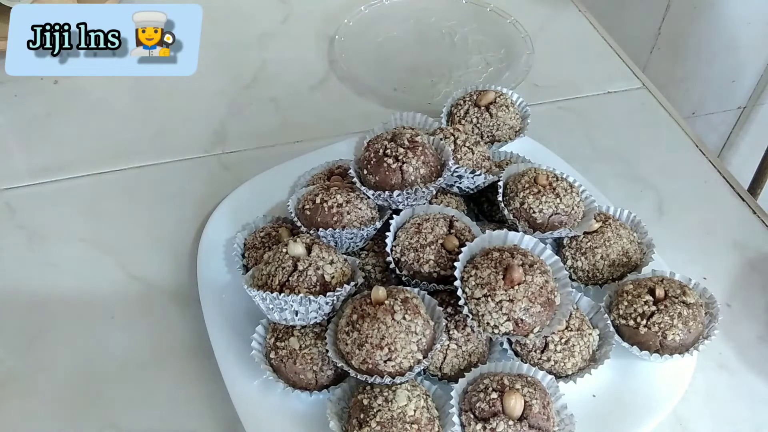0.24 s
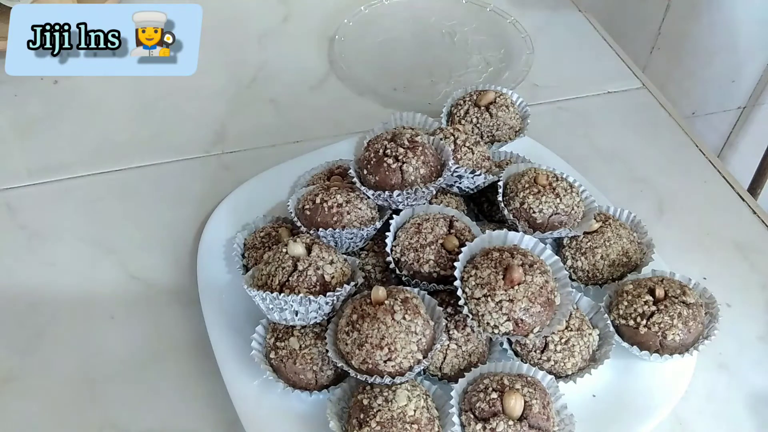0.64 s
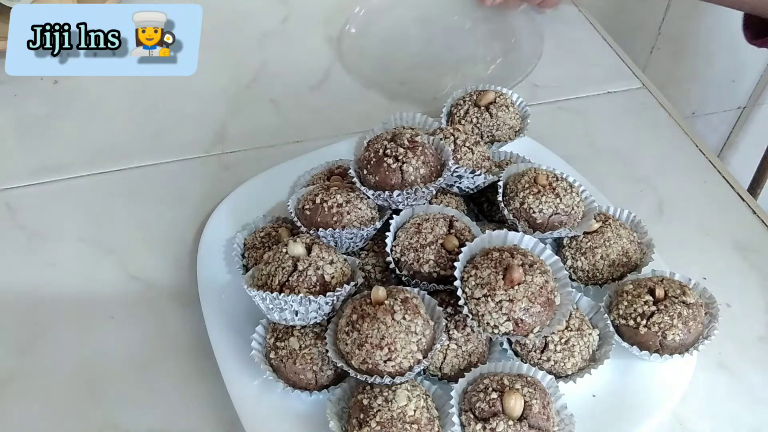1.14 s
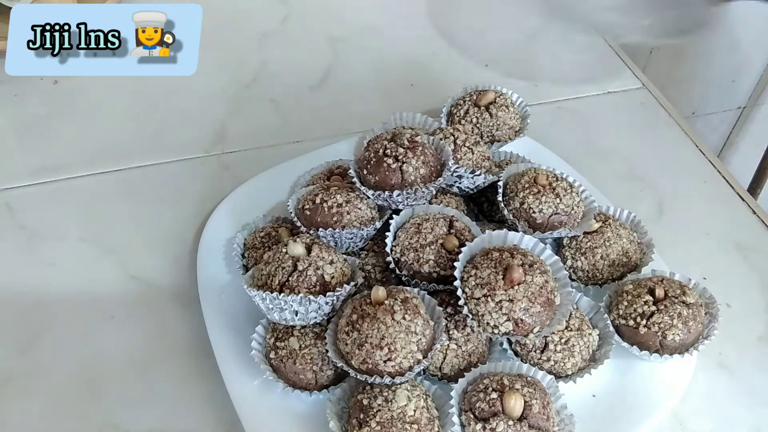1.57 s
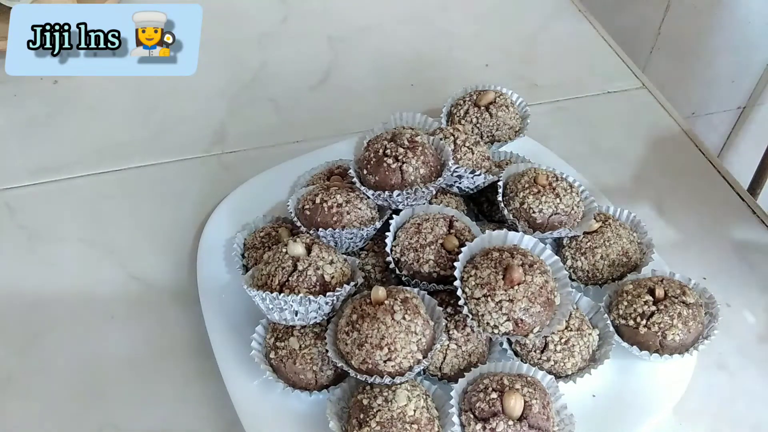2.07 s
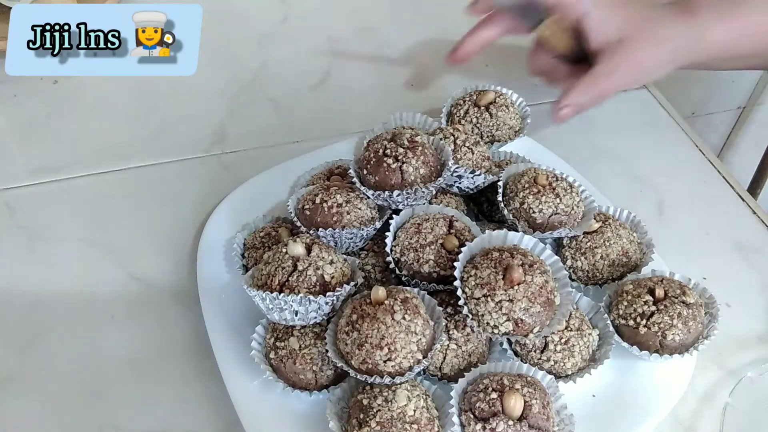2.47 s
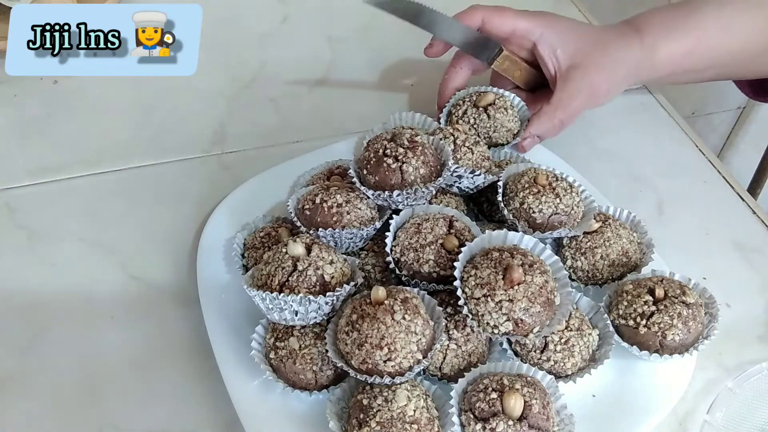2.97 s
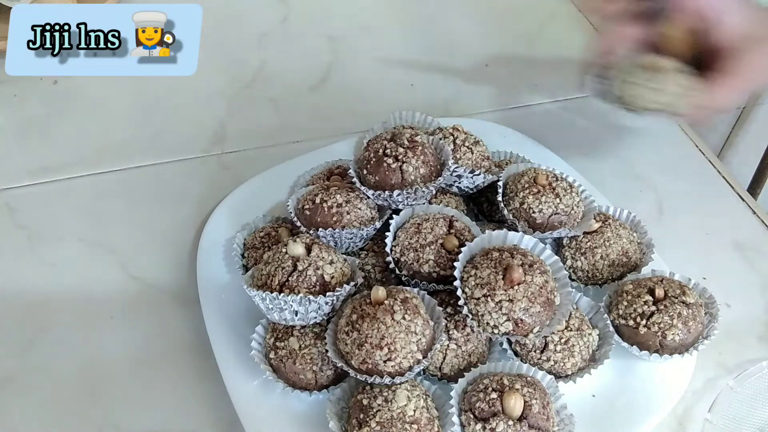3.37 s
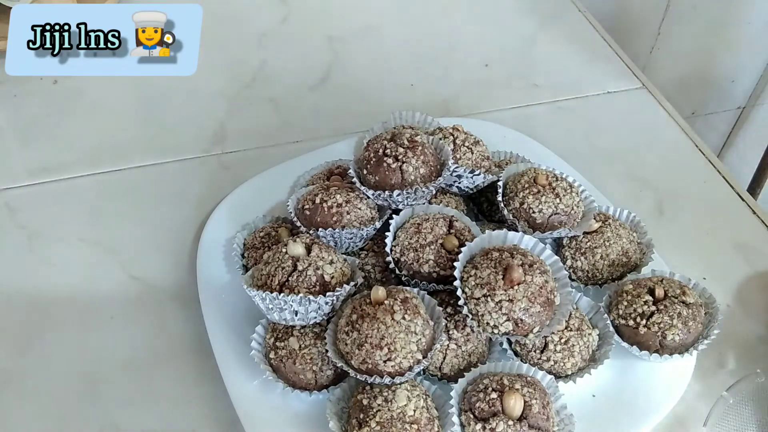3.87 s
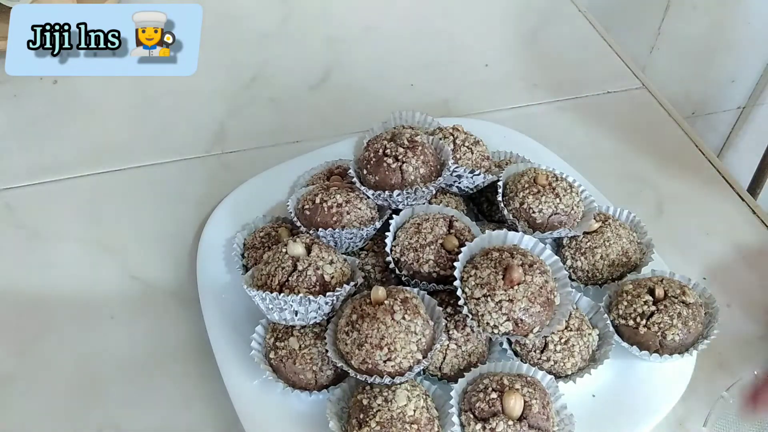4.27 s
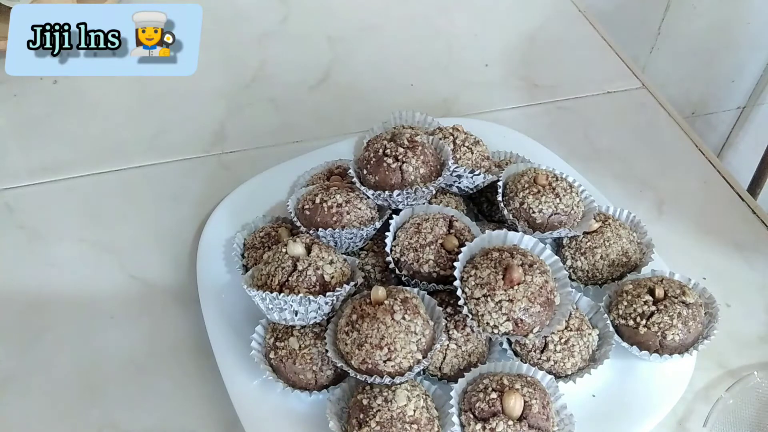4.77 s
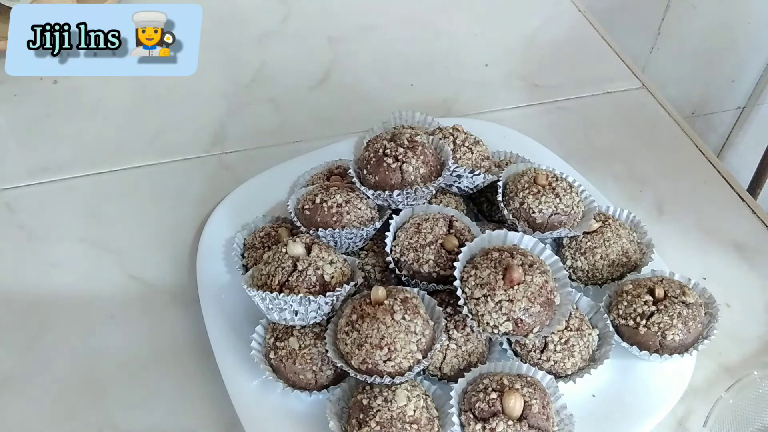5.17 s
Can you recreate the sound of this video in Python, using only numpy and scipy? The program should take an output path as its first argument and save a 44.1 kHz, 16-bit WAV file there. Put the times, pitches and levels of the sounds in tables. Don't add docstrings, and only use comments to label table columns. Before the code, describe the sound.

A small glass dish scrapes over tile, is set down with a clack and rocks, then paper crackles and a hard blade taps ringing glass.

```python
import sys
import numpy as np
from scipy import signal
from scipy.fft import rfft, irfft
from scipy.io import wavfile
from scipy.ndimage import uniform_filter1d, minimum_filter1d

SR = 44100
rng = np.random.default_rng(int(sys.argv[2]) if len(sys.argv) > 2 else 0)


def wrap_up_sound(samples):
    columns = np.atleast_2d(samples).T
    tamed = np.clip(columns, -1, 1)
    steps = np.round(tamed * 32767).astype(np.int16)
    wavfile.write(sys.argv[1], SR, steps)


def gain_from_decibels(decibels):
    exponent = np.asarray(decibels, float) / 20
    return 10 ** exponent


N = 238729
T = np.arange(N) / SR

# peak time in seconds, level in dB, rise in seconds, fall in seconds.
DRONE_SWELLS = [
    (1.56, -59, 0.16, 0.22),
    (2., -68.5, 0.19, 0.17),
    (2.45, -59.5, 0.13, 0.21),
    (2.69, -56.5, 0.11, 0.12),
    (3.7, -56, 0.13, 0.059),
    (3.96, -66.5, .04, 0.0666),
    (4.85, -69, 0.15, 0.037),
    (5.21, -57, 0.1, 0.11),
]
# peak time in seconds, level in dB, rise in seconds, fall in seconds.
THUMPS = [
    (3.47, -72, 0.02, 0.027),
    (.92, -69, 0.033, 0.024),
    (1.19, -68, 0.011, 0.19),
    (2.49, -50, 0.012, 0.059),
    (3.75, -67.5, 0.032, 0.038),
    (3.9, -53, 0.014, .09),
    (4.81, -54.5, 0.032, 0.039),
    (5.22, -63.5, 0.031, 0.082),
]
# peak time in seconds, level in dB, rise in seconds, fall in seconds.
SWAYS = [
    (3.75, -55.5, 0.068, 0.15),
    (4.45, -65, 0.16, 0.18),
    (4.93, -57, 0.11, 0.06),
]
# peak time in seconds, level in dB, rise in seconds, fall in seconds.
SLEEVE_BRUSHES = [
    (0., -68, .01, 0.13),
    (.48, -70.5, 0.14, 0.054),
    (.7, -69.5, 0.21, 0.1),
    (2.15, -70.5, 0.15, 0.19),
    (4.2, -71, 0.1, 0.17),
    (4.6, -66.5, 0.114, 0.12),
    (4.81, -68.5, 0.03, 0.16),
    (5.285, -65, .015, 0.057),
]
# peak time in seconds, level in dB, rise in seconds, fall in seconds.
FINGER_SWEEPS = [
    (.64, -67, 0.093, 0.073),
]
# frequency in Hz, level in dB.
AIR_COLOUR = [(53, -28), (90, -6.5), (135, -19.5), (214, -18.5), (396, -27), (441, -24), (480, -21.5),
              (1070, -28.5), (1440, -27), (1640, -29), (2200, -28), (5250, -35.5), (9910, -33.5),
              (14200, -42.5)]
AIR_DB, DRONE_DB, THUMP_DB, SWAY_DB = -68, -75, -75.5, -62

# peak time in seconds, level in dB, rise in seconds, fall in seconds.
RUSTLES = [(.05, -65.5, 0.16, 0.25), (.35, -73.5, 0.18, 0.029), (.575, -59, 0.036, 0.015),
           (.95, -75, 0.026, 0.13), (1.95, -65.5, 0.021, 0.037), (2.1, -72, 0.023, 0.034),
           (3.05, -59.5, 0.11, 0.055), (3.146, -54.5, 0.012, 0.036), (3.39, -56, 0.18, 0.022),
           (4.225, -61.5, 0.064, 0.0098), (4.54, -65.5, 0.092, 0.15), (4.8, -67, 0.044, 0.035),
           (5.24, -72.5, 0.5, 0.036), (5.38, -68, .015, 0.075)]
# start in seconds, peak in dB, length in seconds, low tones in dB.
CRACKS = [(1.937, -58, .02, -32), (2.079, -58.5, 0.016, -24), (2.409, -53, 0.0069, -29),
          (2.871, -49, 0.014, -9.5), (3.084, -46.5, 0.011, -33), (3.125, -44.5, 0.029, -7),
          (3.145, -27, 0.0076, -17), (3.173, -33, 0.023, -17.5), (3.79, -55, .006, -25),
          (4.068, -49, .003, -35), (4.074, -42.5, 0.0054, -32), (4.206, -37.5, 0.014, -20),
          (4.222, -35.5, 0.0062, -25), (4.281, -53, 0.013, -22), (4.306, -53, 0.0066, -12),
          (4.486, -51.5, 0.038, -37), (4.542, -43.5, 0.011, -42), (4.586, -53, 0.02, -33),
          (4.795, -45, 0.026, -47), (4.812, -58, 0.013, -5), (5.113, -60, 0.015, -37.5),
          (5.181, -51.5, 0.0076, -16), (5.279, -51, 0.015, -37), (5.372, -53.5, 0.0083, -23)]
# frequency in Hz, level in dB.
PAPER_COLOUR = [(1470, -18.5), (2500, -8), (2870, -18.5), (3300, -10.5), (3790, -6), (6000, -7), (6600, -5),
                (9780, 2), (13700, -22), (14300, -11)]
SNAP = 1

# peak time in seconds, level in dB, rise in seconds, fall in seconds,
# brightness in dB.
DRAGS = [(1.16, -57, .05, 0.016, -3), (1.184, -43, 0.021, 0.028, -5), (1.245, -39, .02, 0.031, -5.5),
         (1.3, -38, 0.027, 0.023, -5.5), (1.34, -39, 0.043, 0.0035, -20), (1.378, -38, .01, 0.066, -12.5),
         (1.43, -49, 0.023, 0.009, 2.5), (2.18, -63, 0.066, 0.024, -34), (2.56, -50, .02, 0.16, -11.5),
         (3.2, -64, 0.26, 1, -38), (3.872, -38.5, 0.017, 0.0019, 2.5), (3.955, -45, .012, 0.026, 8.5)]
# start in seconds, peak in dB, contact in ms,
# length in seconds, judder in Hz.
BUMPS = [(1.174, -31, 0.078, 0.0098, 643), (1.179, -29.5, 0.053, 0.0063, 1420),
         (1.221, -34, 0.22, 0.0036, 630), (1.233, -46, 0.086, 0.0047, 1420),
         (1.254, -29, 0.14, 0.0032, 1603), (1.29, -40, 0.08, 0.005, 3320), (1.295, -24, 0.17, 0.0026, 1597),
         (1.315, -26, 0.1, 0.0068, 2330), (1.319, -23, 0.069, 0.0017, 1258),
         (1.333, -20.5, 0.036, 0.0051, 1220), (1.335, -16.5, 0.086, 0.0037, 2395),
         (1.356, -28.5, 0.053, 0.0041, 2330), (1.368, -23, 0.09, 0.0043, 1265),
         (1.377, -26, 0.069, 0.0043, 1206), (1.387, -24, 0.057, 0.0019, 1215),
         (1.395, -27, 0.12, 0.0034, 1970), (1.403, -39, 0.11, 0.00099, 2280),
         (1.427, -31.5, 0.29, 0.0052, 1160), (1.432, -34, 0.11, 0.0016, 5390),
         (1.447, -45, 0.15, 0.004, 1420)]
# start in seconds, peak in dB.
TICKS = [(1.180, -42), (1.221, -39.5), (1.236, -45), (1.247, -53), (1.2571, -46), (1.2965, -36),
         (1.3184, -42), (1.3354, -48), (1.362, -37), (1.3718, -50), (1.388, -44), (1.398, -49),
         (1.4207, -44), (1.428, -28), (1.455, -30.5), (1.47, -44)]
GRIT_DB, SOFTEST_S = 3.0, 0.0028
JUDDER_TONE = 0.046
PRESSED_DB, PRESSED_S = -6, 0.0028
LANDING_GRIT_DB, LANDING_GRIT_S, LANDING_BRIGHT_DB = -9, 0.02, -9.5

# start in seconds, peak in dB, chatter length in seconds,
# chatter in dB, thud in dB.
SET_DOWN = [
    (2.483, -13, 0.002, -19, -33),
    (2.512, -51, .004, -6, -25.5),
    (2.533, -38, .006, -17, -26.5),
]
# start in seconds, peak in dB, chatter length in seconds, chatter in dB, thud in dB.
NUDGES = [
    (3.407, -21, 0.005, -8.5, -21),
    (3.413, -25, 0.0094, -8.5, -23),
    (3.454, -18, 0.0036, -6.5, -19.5),
    (3.462, -22, 0.0064, -2.5, -20),
    (3.469, -26, 0.0013, -13.5, -20),
]
# start in seconds, peak in dB, chatter length in seconds, chatter in dB, thud in dB.
KNIFE_TAPS = [
    (3.859, -39, .004, -6, -24),
    (3.874, -4.5, 0.0035, -13, -29),
    (3.8775, -10, 0.0015, -8.5, -32),
    (3.884, -16, 0.0023, -0.5, -30),
    (3.892, -14.5, .008, -8, -28.5),
    (3.921, -22.5, 0.0045, -4, -30),
    (3.948, -28.5, 0.017, -5, -36),
]
# start in seconds, peak in dB,
# bowl tone in Hz, foot tone in Hz, foot tone in dB.
ROCKS = [(2.6348, -43.5, 1106, 513, -5), (2.6684, -41, 1158, 735, -10), (2.7030, -34.5, 1250, 747, -14.5),
         (2.7394, -47.5, 1215, 710, -3), (2.7655, -39.5, 1202, 666, -14), (2.8346, -42, 1127, 547, -5),
         (2.8688, -41, 1230, 560, -6), (2.9054, -53, 1136, 635, 5.5), (2.9445, -43.5, 1228, 573, -11),
         (2.98, -43.5, 1240, 683, -4), (3.017, -39.5, 1266, 660, -22), (3.0434, -61, 1200, 670, -6),
         (3.0680, -51.5, 1160, 654, 2.5), (3.0905, -45.5, 1210, 545, -11.5), (3.167, -44, 1246, 721, -4.5),
         (3.2276, -52.5, 1126, 710, 2), (3.2605, -53.5, 1240, 684, 4.5), (3.2894, -66, 1240, 730, 7),
         (3.3134, -61, 1270, 673, 9.5), (3.3494, -61.5, 1340, 652, 9.5)]
RIM_DB = -33.5

# frequency in Hz, time to fall 60 dB in seconds, left minus right in
# dB, then level in dB when dragged, set down, nudged and tapped by the knife.
DISH_MODES = [(508.6, 0.36, -9.5, -12.5, -16, -19, -40.5), (772, 0.04, -6.5, -9.5, -9.5, -15.5, -19.5),
              (1336, 0.066, -4, -21.5, -24, -10.5, -17), (1222, 0.12, 3, -1, -18, -2.5, -19),
              (1462, 0.12, 6, -7.5, -25.5, -26, -14), (1634, 0.034, 6, 2, -6.5, -2, -14.5),
              (2012, 0.35, 12, -8, -6.5, -16.5, -16), (2320, 0.25, 9, -15.5, -5.5, 0.5, -3.5),
              (2304, 1.3, 9.5, -32, -27, -20, -20), (641, 0.095, -1, -3, -22, -28.5, -18),
              (294.6, 0.37, 1, -13.5, -43, -14, -25), (1055, 0.049, 1, -15.5, -4.5, -12.5, -28),
              (1582, 0.12, 5, -12, -17, -16.5, -15), (1760, 0.047, -1, -14, -21, -9.5, -19.5),
              (3471, 0.52, 9, -28, -36, -13, -13), (3140, 0.05, -7, -33, -26.5, 2, -7),
              (3718, 0.17, 4.5, -11.5, -19, -16.5, -11.5), (3381, 0.17, 14.5, -11, -27.5, -12, -10),
              (5380, 0.28, -5, -10, -10, -9, -10), (4430, 0.087, 3, -27.5, -15, -26, -30.5),
              (5710, 0.036, -4, -36, -17.5, -24.5, -13), (5832, 0.35, 3, -29.5, -21, -24, -11),
              (3407, 0.46, 0.5, -27, -7.5, -26, -26), (2325, .35, 8.5, 0, -38, -27.5, -27.5),
              (2878, 0.038, 9, -24, -38, -14, -13.5), (4660, 0.071, -2, -23, -20, -24, -24),
              (5470, 0.49, 0.5, -24.5, -13.5, -37, -18.5), (5650, 0.077, -3.5, -27, -7, -22, -17),
              (7870, 0.26, -14, -8, -25, -18, -7.5), (8016, 0.14, -9.5, -7, -7, -9.5, -7),
             (8040, 0.36, 13.5, -20.5, -21.5, -24, -23), (8880, 0.05, 14, -21.5, -41, -27, -18.5),
             (10650, 0.06, 6, -10.5, -6.5, -25, -19), (10870, 0.15, 8.5, -15.5, -9, -21.5, -12),
             (13630, 0.1, -16, -28, -22, -52, -26), (14140, .1, 6, -22.5, -32, -31, -28.5),
             (7195, 0.34, 1.5, -19, -31, -22.5, -19.5), (8700, 0.033, 5.5, -18.5, -31, -37, -20),
             (9530, 0.093, 0, -24, -24.5, -42, -22.5), (10250, .08, 0, -27, -32, -40, -20.5),
             (8000, 0.3, 2, -11, -33, -20, -12), (6830, .1, 0, -28.5, -30, -31, -32)]
HOLD = {3: (0.36, 0.57), 4: (0.28, 0.56), 5: (0.26, 0.33), 6: (0.31, 0.31)}
DAMPED_T60_S = 0.018
# frequency in Hz, level in dB.
RING_FILTER = [(150, -32), (300, -4), (11050, 0.5), (11500, -38), (13100, -42.5), (13600, 1)]
# frequency in Hz, level in dB.
COUNTER_COLOUR = [(60, -41), (150, -30), (300, -18.5), (600, -2.5), (1200, 15), (2100, 7.5), (2600, -2),
                  (4000, -6.5), (8000, -23), (11000, -32.5), (12000, -56.5), (15500, -42.5)]

# frequency in Hz, time to fall 60 dB in seconds.
ROOM_DECAY = [(100, 0.55), (260, 0.36), (700, 0.38), (1840, 0.33), (4850, 0.34), (12800, 0.21)]
# frequency in Hz, likeness from -1 to 1.
NOISE_LIKENESS = [(30, 0.93), (90, 1), (180, 0.73), (350, 0.4), (750, 0.3), (1300, -0.31), (3000, -0.042),
                  (5000, -0.13), (6500, 0.5), (15000, 0.96)]
# frequency in Hz, left minus right in dB.
PORT_DIFFERENCE = [(60, 0), (180, -3), (400, 1.5), (5000, -1), (7000, -5), (10000, 5), (14000, 17)]
# frequency in Hz, level in dB.
PORT_TOP = [(14250, 0), (14550, -22), (15100, -22), (15700, -28), (15800, -90)]
# frequency in Hz, depth under the loudest neighbour in dB.
MASK = [(3000, 60), (4000, 35), (5000, 33), (6200, 22), (7400, 21.5), (9500, 26.5), (12000, 22),
        (13400, 16.5), (13700, 61)]
ROOM_DB, RIGHT_LAG_S, MASK_DEPTH_DB = -2.5, 0.000194, 24.5


def on_log(table, hz):
    points = np.array(table)
    return np.interp(np.log(hz + 1), np.log(points[:, 0]), points[:, 1])


def colour(x, table):
    n = x.shape[-1]
    gain = gain_from_decibels(on_log(table, np.fft.rfftfreq(n, 1 / SR)))
    return irfft(rfft(x) * gain, n)


def band(x, lo_hz, hi_hz):
    return signal.sosfilt(signal.butter(2, [lo_hz, hi_hz], "band", fs=SR, output="sos"), x)


def unit(x):
    return x / np.sqrt(np.mean(x ** 2))


def lean(db):
    return gain_from_decibels(np.array([[.5], [-.5]]) * db)


def pair(n, near=0.):
    like = np.clip(on_log(NOISE_LIKENESS, np.fft.rfftfreq(n, 1 / SR)), -1, 1)
    like = np.clip(like + near * (1 - like), -1, 1)
    mid, side = rfft(rng.standard_normal((2, n)))
    shared = mid * np.sqrt((1 + like) / 2)
    opposed = np.array([[1], [-1]]) * side * np.sqrt((1 - like) / 2)
    return irfft(shared + opposed, n)


def walk(rate):
    k = int(SR / rate)
    return unit(uniform_filter1d(uniform_filter1d(rng.standard_normal(N), k), k))


def swells(table):
    s, db, rise, fall = np.array(table, float)[:, :4, None].transpose(1, 0, 2)
    width = np.maximum(np.where(T < s, rise, fall), .001)
    return gain_from_decibels(db) * np.exp(-((T - s) / width) ** 2)


def fade(t, t60):
    return np.exp(-np.log(1000) * t / t60)


def tone(hz, t60, t):
    return (t >= 0) * fade(t, t60) * np.sin(2 * np.pi * hz * t)


def add(x, s, piece):
    i = int(s * SR)
    x[..., i:i + piece.shape[-1]] += piece[..., :N - i]


def through(force, response):
    return signal.fftconvolve(force[None], response, axes=1)[:, :N]


def room_air():
    return gain_from_decibels(AIR_DB + 0.18 * walk(3.7)) * unit(colour(pair(N), AIR_COLOUR))


def far_traffic():
    drone = unit(band(band(pair(N), 68, 88), 45, 84))
    return drone * (gain_from_decibels(DRONE_DB) + swells(DRONE_SWELLS).sum(axis=0))


def cupboard_thumps():
    return unit(band(pair(N), 62, 210)) * (gain_from_decibels(THUMP_DB) + swells(THUMPS).sum(axis=0))


def phone_sway():
    return unit(band(pair(N), 8.7, 35)) * (gain_from_decibels(SWAY_DB) + swells(SWAYS).sum(axis=0))


def sleeves():
    return unit(band(pair(N), 210, 1100)) * swells(SLEEVE_BRUSHES).sum(axis=0) * gain_from_decibels(3.1 * walk(28))


def paper_cup():
    high, low, t = np.zeros((2, N)), np.zeros((2, N)), np.arange(4000) / SR
    for s, db, length, low_db in CRACKS:
        shape = SNAP * np.exp(-t / 0.0018) + 0.4 * np.exp(-t / max(length, .001))
        burst = gain_from_decibels(db + 0.5) * pair(len(t)) * shape
        add(high, s, burst)
        add(low, s, gain_from_decibels(low_db) * burst)
    grains = pair(N) * gain_from_decibels(2 * rng.exponential(size=N) + 3.2 * walk(70))
    rustle = unit(colour(grains, PAPER_COLOUR)) * swells(RUSTLES).sum(axis=0)
    return colour(high, PAPER_COLOUR) + gain_from_decibels(5.0) * band(low, 2000, 6200) + rustle


def fingertip():
    return unit(band(pair(N), 1760, 2260)) * swells(FINGER_SWEEPS).sum(axis=0)


def ring(column):
    lead_s = .005
    t = np.arange(SR // 4) / SR - np.array([[lead_s], [lead_s + RIGHT_LAG_S]])
    clear_length, damped_share = HOLD[column]
    out = 0
    for k, row in enumerate(DISH_MODES):
        hz, t60, left_right_db = row[:3]
        split = 1 + np.array([-.012, .014])[:, None, None] + 0.019 * rng.standard_normal((2, 2, 1))
        mode = 0.78 * tone(hz, clear_length * t60, t)
        mode = mode + sum(damped_share * tone(hz * d, DAMPED_T60_S, t) for d in split)
        out = out + (-1) ** k * gain_from_decibels(row[column]) * lean(left_right_db) * mode
    return colour(out * np.clip(t / .0003, 0, 1), RING_FILTER)[:, int(lead_s * SR):] / 4


def dragged():
    grit = rng.standard_normal(N) * gain_from_decibels(GRIT_DB * rng.exponential(size=N) + 2.9 * walk(90))
    dull, bright = unit(band(grit, 360, 2800)), unit(band(grit, 3000, 9200))
    landings = [(r[0], r[1] + LANDING_GRIT_DB, .004, LANDING_GRIT_S, LANDING_BRIGHT_DB) for r in ROCKS]
    strokes = DRAGS + landings
    gains = swells(strokes)
    level = gains.sum(axis=0)
    edge = gain_from_decibels(np.array(strokes)[:, 4]) @ gains
    force = gain_from_decibels(-26.0) * (level * dull + gain_from_decibels(11.0) * edge * bright)

    t, pressed = np.arange(800) / SR, np.zeros((2, N))
    late = np.clip(t - np.array([[0], [RIGHT_LAG_S]]), 0, 1)
    for s, db, contact_ms, length, hz in BUMPS:
        u = t[:80] / max(contact_ms, .02) * 1000
        push = u * np.exp(-4 * u)
        swell = max(length / 2, SOFTEST_S / 3)
        judder = 0.41 * rng.standard_normal(len(t)) + JUDDER_TONE * np.sin(2 * np.pi * hz * t)
        judder = judder * t / swell * np.exp(-t / swell)
        add(force, s, gain_from_decibels(db - 11.5) * np.convolve(judder, push / push.sum()))
        spot = (late / PRESSED_S) ** 2 * np.exp(-late / PRESSED_S) * np.sin(2 * np.pi * hz * late)
        add(pressed, s, gain_from_decibels(db + PRESSED_DB) * spot)
    click = np.array([1., -1.])
    for s, db in TICKS:
        add(force, s, gain_from_decibels(db) * click)
    for row in ROCKS:
        add(force, row[0], gain_from_decibels(row[1] - 4.0) * click)
    scrape = gain_from_decibels(-15.0 + 2.9 * walk(50)) * level * colour(pair(N, near=0.52), COUNTER_COLOUR)
    return through(force, ring(column=3)) + scrape + pressed


def blows(table, column, knock_db):
    force, thud, t = np.zeros(N), np.zeros((2, N)), np.arange(4000) / SR
    for s, db, length, chatter_db, thud_db in table:
        chance = rng.standard_normal((2, len(t)))
        rebounds = chance[0] * (chance[1] > 1.6) / (1 + (t / length) ** 4)
        hits = rfft((t == 0) + gain_from_decibels(chatter_db) * rebounds)
        even = irfft(hits / np.sqrt(abs(hits) ** 2 + 0.5), len(t))
        add(force, s, gain_from_decibels(db + 6) * even / (1 + (t / length / 2) ** 4))
        boom = unit(band(pair(len(t), near=0.26), 240, 1600))
        add(thud, s, gain_from_decibels(db + thud_db) * boom * fade(t, 0.098))
    knock = pair(len(t), near=0.2) * fade(t, 0.026)
    knock = gain_from_decibels(knock_db) * colour(through(force, knock), COUNTER_COLOUR)
    return through(force, ring(column=column)) + knock + thud


def set_down():
    return blows(SET_DOWN, column=4, knock_db=-11)


def rocking():
    out, t = np.zeros((2, N)), np.arange(4000) / SR - np.array([[0], [RIGHT_LAG_S]])
    for s, db, bowl_hz, foot_hz, foot_db in ROCKS:
        near = 1 + 0.0554 * rng.standard_normal(4)
        bowl = tone(bowl_hz, 0.073, t) + .5 * tone(bowl_hz * near[0], 0.14, t)
        foot = tone(foot_hz, 0.11, t[0]) + .5 * tone(foot_hz * near[1], 0.02, t)
        rim = tone(1600 * near[2], 0.056, t) - tone(2260, 0.04, t)
        rim = rim + gain_from_decibels(19.5) * tone(302, 0.056, t[0]) + .5 * tone(2000 * near[3], .04, t)
        landing = bowl + gain_from_decibels(foot_db) * foot + gain_from_decibels(RIM_DB) * rim
        add(out, s, gain_from_decibels(db - 2.0) * np.clip(t / 0.0033, 0, 1) * landing)
    return out


def nudged():
    return blows(NUDGES, column=5, knock_db=-12)


def knife():
    return blows(KNIFE_TAPS, column=6, knock_db=-16.5)


def kitchen_echo(x):
    t = np.arange(int(.7 * SR)) / SR
    noise, tail = pair(len(t), near=0.1), 0
    for hz in 70 * 2. ** np.arange(8):
        tail = tail + band(noise, hz, hz * 2) * fade(t, on_log(ROOM_DECAY, hz * 1.3))
    tail = tail * np.clip(t / 0.0012, 0, 1)
    tail = tail / np.sqrt(np.sum(tail ** 2, axis=1, keepdims=True))
    return gain_from_decibels(ROOM_DB) * through(x.mean(axis=0) + x[0], tail) / 2


def scene():
    near = lean(-1.9) * dragged()
    near = near + lean(-.3) * rocking()
    near = near + lean(4.9) * set_down()
    near = near + lean(.4) * nudged()
    near = near + lean(0.63) * knife()
    near = near + paper_cup()
    echo = kitchen_echo(near)
    background = room_air() + far_traffic() + cupboard_thumps() + phone_sway() + sleeves() + fingertip()
    return near + echo + background


def masked(x):
    hz, _, z = signal.stft(x, SR, nperseg=1024)
    power = uniform_filter1d((abs(z) ** 2).mean(axis=0), size=7, axis=0)
    db = 10 * np.log10(power + 1e-20)
    loudest = -minimum_filter1d(-db, size=61, axis=0)
    under = loudest - db - on_log(MASK, hz)[:, None]
    quieter = gain_from_decibels(-MASK_DEPTH_DB * np.clip(under / 4, 0, 1))
    return signal.istft(z * quieter, SR, nperseg=1024)[1][:, :N]


def top_cut(x):
    return signal.sosfilt(signal.butter(12, 15840, fs=SR, output="sos"), x)


def record(dry):
    hz = np.fft.rfftfreq(N, 1 / SR)
    tilt_db = on_log(PORT_DIFFERENCE, hz) * np.array([[.5], [-.5]]) + on_log(PORT_TOP, hz)
    mix = irfft(rfft(masked(dry)) * gain_from_decibels(tilt_db), N)
    return top_cut(mix)


dry = scene()
out = record(dry)
wrap_up_sound(out)
```